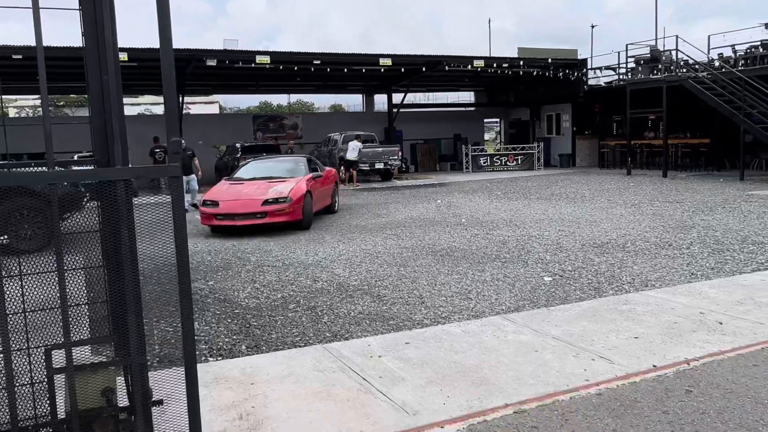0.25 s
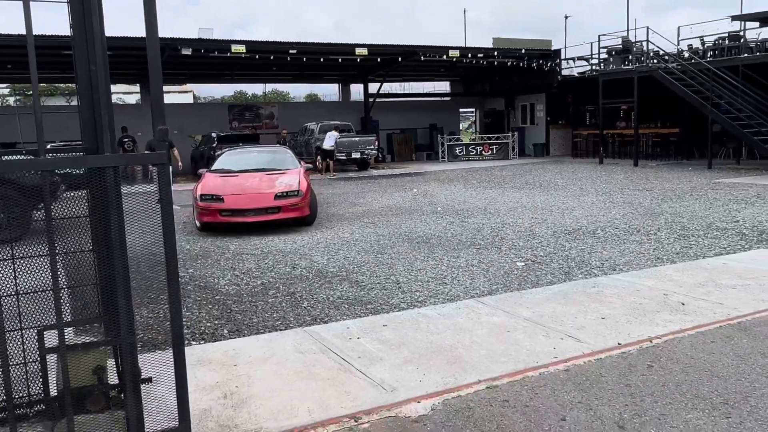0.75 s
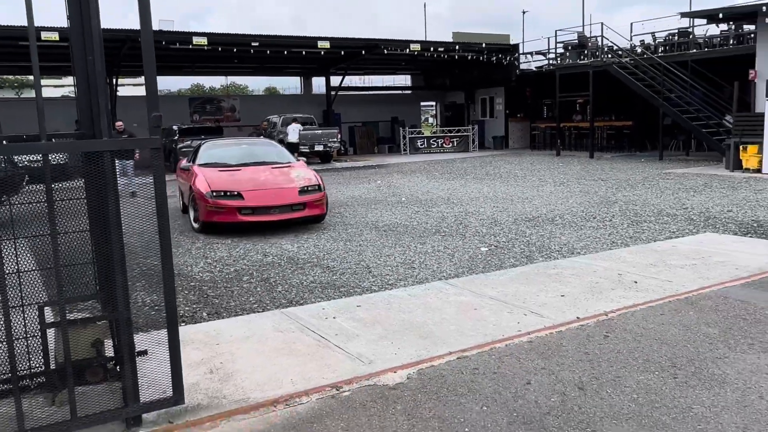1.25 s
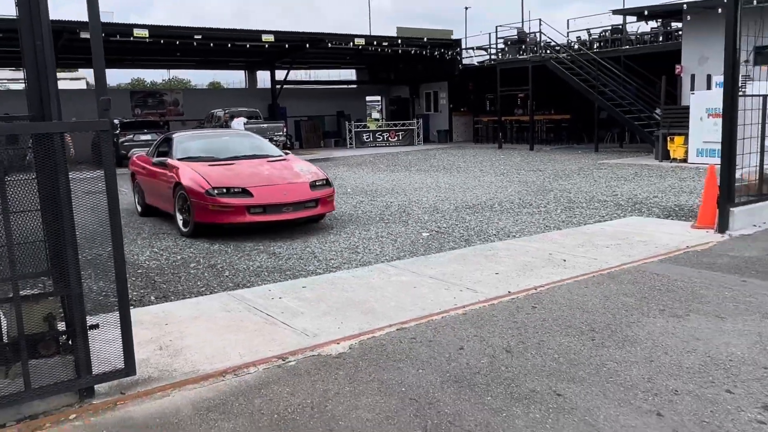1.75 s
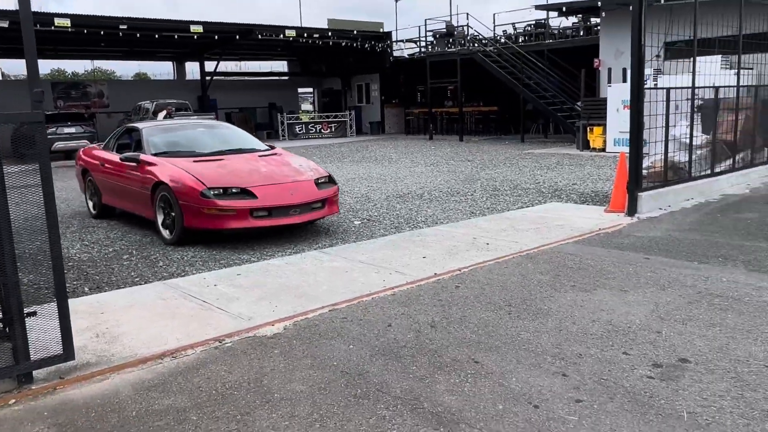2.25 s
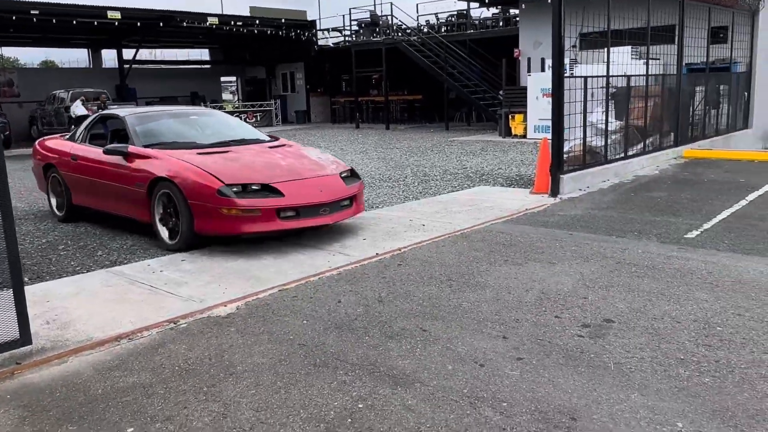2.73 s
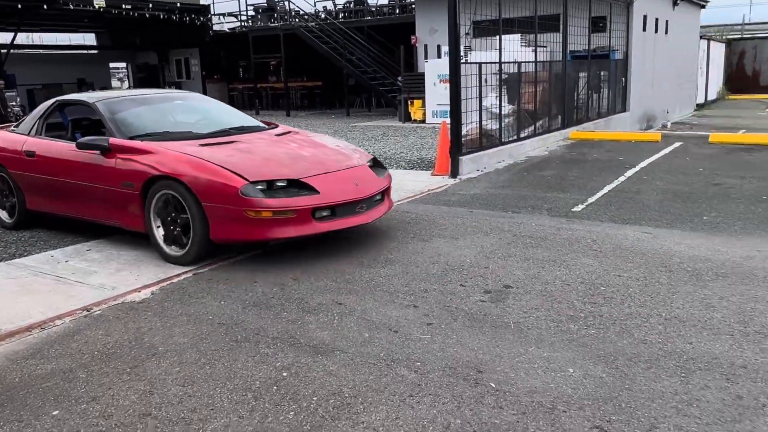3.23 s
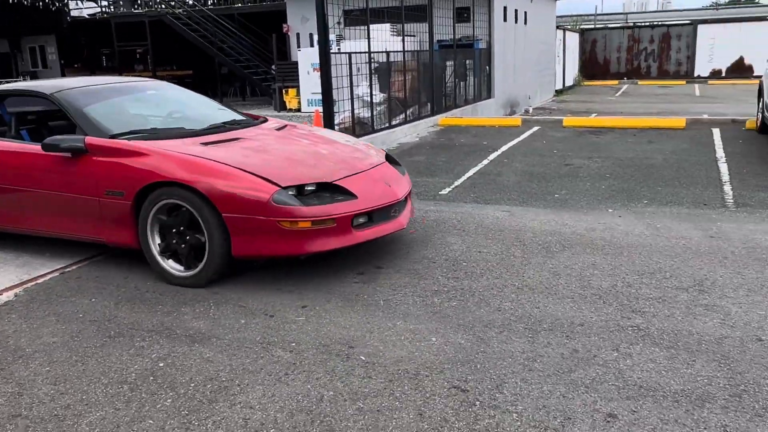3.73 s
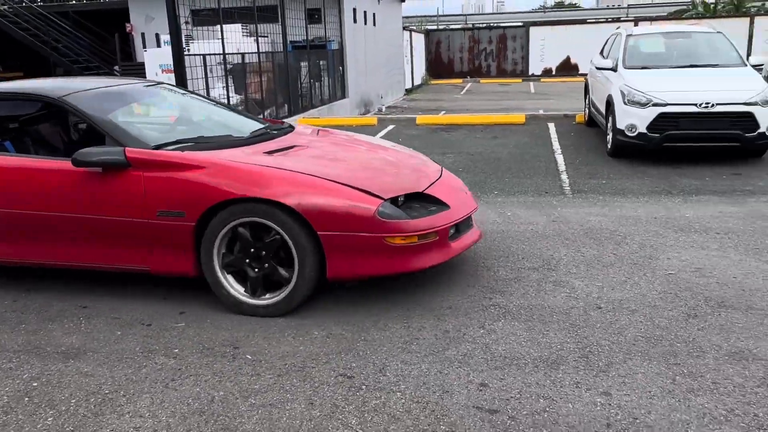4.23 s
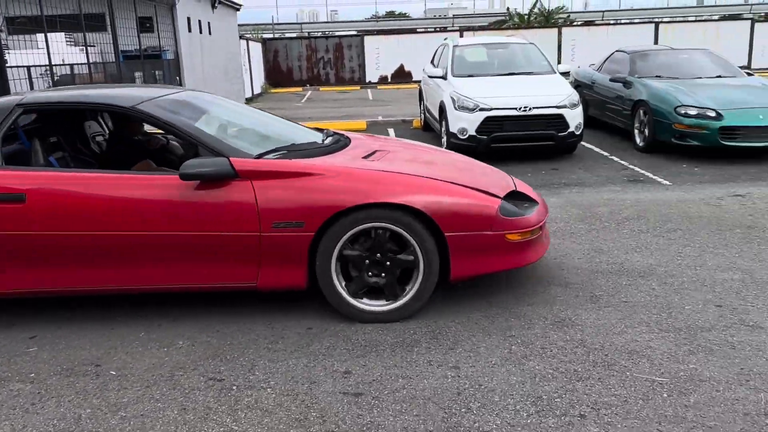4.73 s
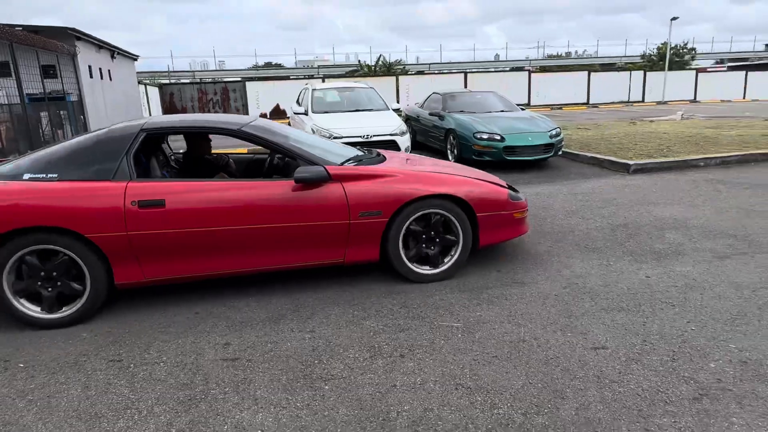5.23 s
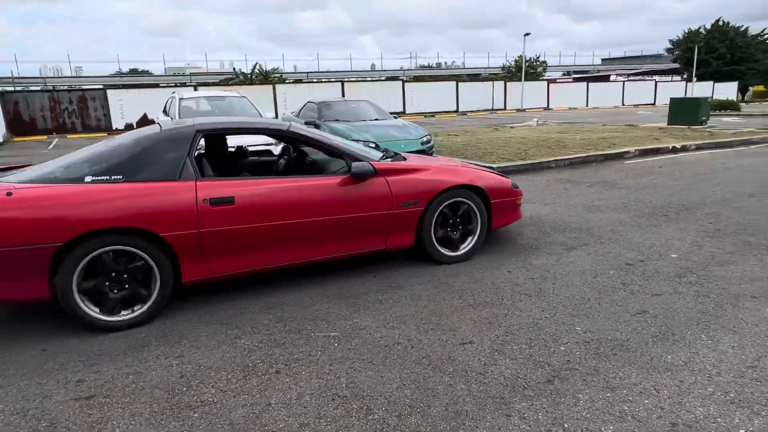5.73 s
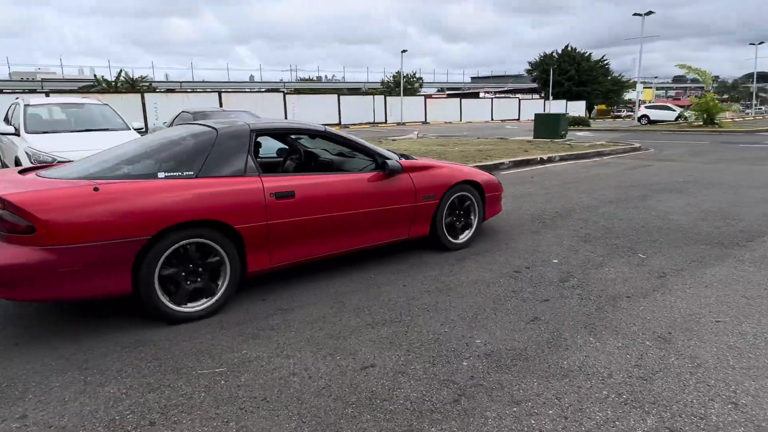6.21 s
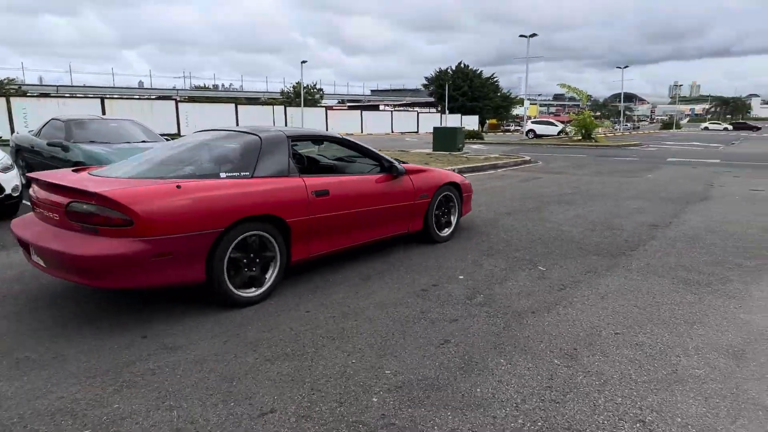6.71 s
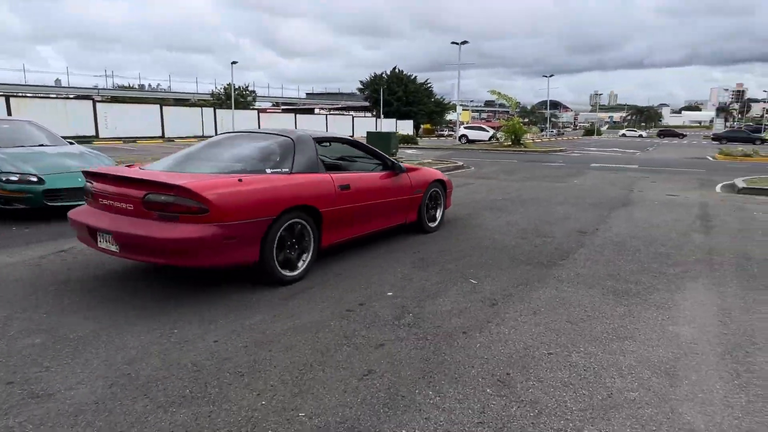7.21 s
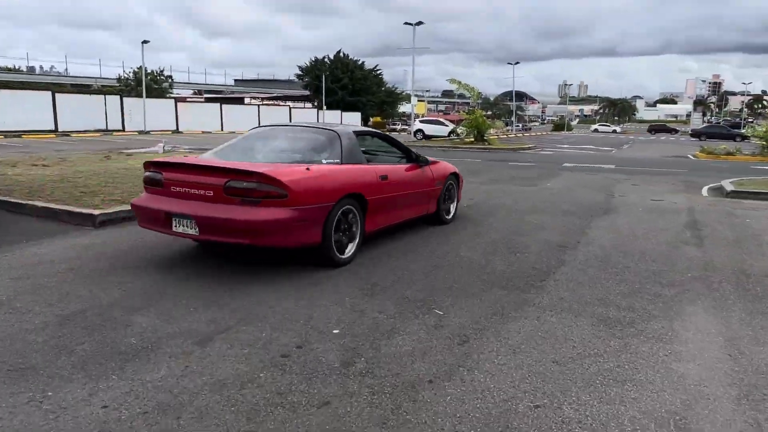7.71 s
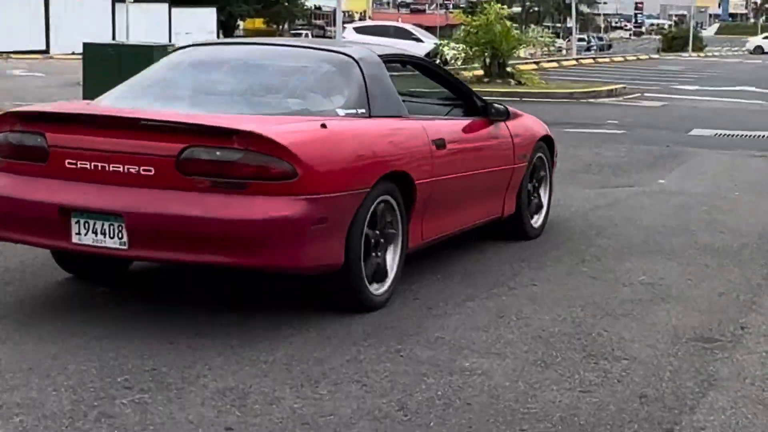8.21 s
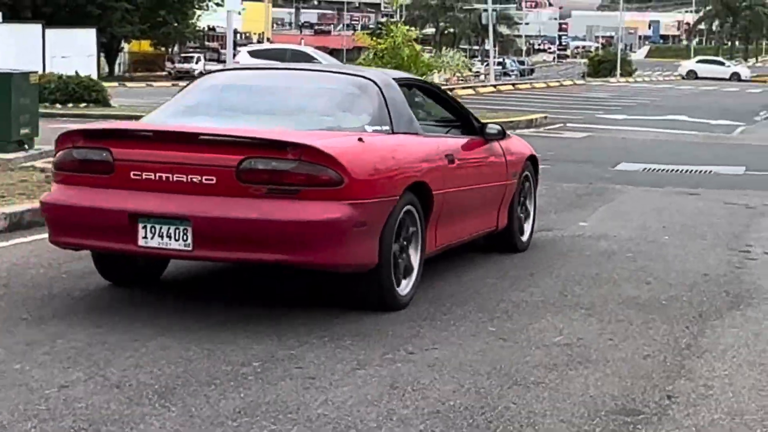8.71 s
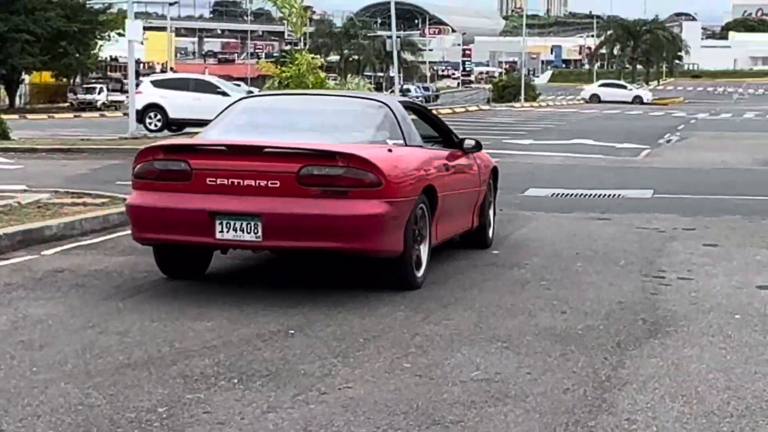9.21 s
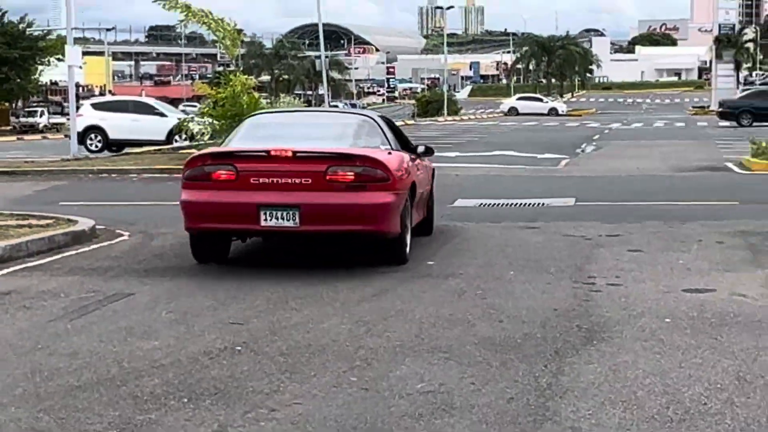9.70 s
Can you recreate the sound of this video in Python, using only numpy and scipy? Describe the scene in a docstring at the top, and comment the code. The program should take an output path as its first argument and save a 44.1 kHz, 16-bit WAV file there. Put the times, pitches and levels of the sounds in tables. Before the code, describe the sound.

Stones knock under tyres as a deep, booming V8 car accelerates past, drops to a stumbling idle and moves off.

```python
"""A V8 car with an open exhaust rolls off a gravel lot, with faint traffic far away. Its firings, uneven
between the cylinder banks, boom in the pipe resonances; turbulent gas roars and hisses at the tailpipes,
and stones crunch, knock and snap under the tyres. The revs climb and the car passes close by, onto
asphalt, with a rough whine. After 7 s the throttle closes, the idle stumbles and something rustles
nearby; then the sound narrows to the centre as the car drives away."""
import sys
import numpy as np
from scipy import signal
from scipy.fft import rfft, irfft, next_fast_len
from scipy.io import wavfile
from scipy.ndimage import uniform_filter1d

SR = 44100
rng = np.random.default_rng(int(sys.argv[2]) if len(sys.argv) > 2 else 0)


def output_pcm(signal):
    """Save a mono or channel-first signal as 16-bit PCM at the path in sys.argv[1].

    Samples are clipped to [-1, 1] before scaling.
    """
    pcm = np.clip(np.atleast_2d(signal).T, -1, 1) * 32767
    wavfile.write(sys.argv[1], SR, np.round(pcm).astype(np.int16))


N = 438794
TIME, FFT_SIZE = np.arange(N) / SR, next_fast_len(N)
LOG_HZ = np.log(np.arange(FFT_SIZE // 2 + 1) * SR / FFT_SIZE + 1)


def from_db(db):
    """Amplitude ratio of a level."""
    return 10 ** (np.asarray(db) / 20)


def unit_rms(x):
    """Normalisation to rms 1."""
    return x / np.sqrt(np.mean(x ** 2) + 1e-20)


def in_time(rows):
    """Linear interpolation of each column over t/s, one value a sample."""
    s, *columns = np.transpose(rows)
    return [np.interp(TIME, s, c) for c in columns]


def drift(rate_hz):
    """Low-pass noise of rms 1: a slow random modulator."""
    r = np.exp(-80 * np.pi * rate_hz / SR)
    slow = signal.lfilter([1], [1, -2 * r, r * r], rng.standard_normal(N // 40 + 2002))[2000:]
    return np.interp(np.arange(N) / 40, np.arange(len(slow)), unit_rms(slow))


def resonance(x, hz, width_hz, stages=1):
    """Damped two-pole resonators in cascade, each of peak gain 1."""
    r = np.exp(-np.pi * width_hz / SR)
    b, a = [(1 - r * r) / 2, 0, (r * r - 1) / 2], [1, -2 * r * np.cos(2 * np.pi * hz / SR), r * r]
    for _ in range(stages):
        x = signal.lfilter(b, a, x)
    return x


def coloured(spectrum, x, response=1):
    """Spectral shaping by (f/Hz, level/dB) rows and an optional complex response."""
    hz, db = np.transpose(spectrum)
    gain = from_db(np.interp(LOG_HZ, np.log(hz), db, -90, -90))
    return irfft(rfft(x, FFT_SIZE) * gain * response, FFT_SIZE)[:N]


def levelled(x):
    """Division by the running rms over 0.3 s."""
    return x / np.sqrt(uniform_filter1d(x ** 2, int(.3 * SR), mode="reflect") + 1e-12)


def rounded(x):
    """Low-pass filtering: a rounded pressure pulse holds little above the pipe note."""
    return signal.sosfilt(signal.butter(4, 520, fs=SR, output="sos"), x)


# Cylinder strengths in firing order: level/dB
CYLINDERS = [2.8, .8, -.9, .2, -.2, .9, 0, -.6]
# Uneven burning, worst at low revs and off the throttle: t/s, standard deviation/dB
BURN_SCATTER = [(0, .9), (1.4, 1.0), (2, .7), (3.8, .35), (7, .3), (7.4, 1.8), (8.3, 1.2), (9, .4),
                (9.95, .25)]
def firings(cycle):
    """Combustion variability: each pulse is one firing's departure from the mean strength."""
    count = np.floor(8 * cycle).astype(int)
    at = np.flatnonzero(np.diff(count)) + 1
    burn_db = in_time(BURN_SCATTER)[0][at] * rng.standard_normal(len(at))
    pulses = np.zeros(N)
    pulses[at] = from_db(np.array(CYLINDERS)[count[at] % 8] + burn_db) - from_db(CYLINDERS).mean()
    return rounded(pulses)


# Engine orders: multiples of the cycle rate
ORDERS = (7, 9, 10, 20, 8, 5, 6, 11, 12, 13, 14, 16, 21, 22, 23, 24, 15, 19)
# Orders swell as the revs carry them through pipe resonances: cycle rate/Hz, level/dB of each order
ORDER_LEVELS = [(6.2, -37, -32, -30, -44, -25, -53, -51, -42, -10.5, -15.5, -9.5, -13.5, -56, -45, -29.5, -45, -21, -36),
                (7.4, -30, -26, -32, -40, -23.5, -40, -36.5, -41, -13, -12.5, -33.5, -32.5, -46, -45, -33, -50, -25.5, -34),
                (8.5, -38, -24, -29, -50, -16, -39.5, -38.5, -23.5, -19, -25.5, -31, -42.5, -43, -39, -45.5, -45, -27.5, -24),
                (9.7, -47.5, -21.5, -37, -45, -13, -39, -40, -20.5, -26.5, -22.5, -20.5, -26, -44.5, -37.5, -38, -50, -22, -39),
                (11, -7, -20, -34, -35, -16, -31, -32, -27.5, -27, -37, -27.5, -42, -47, -48, -38, -38, -36, -26),
                (12.2, -24.5, -20, -19, -45, -13.5, -38.5, -23.5, -34, -29.5, -32.5, -18, -31.5, -48, -48.5, -33, -29, -34.5, -34),
                (13.2, -22, -30, -19.5, -38, -14.5, -21, -9, -37, -17, -24.5, -30, -28, -40, -48, -28, -24.5, -47, -35),
                (14, -23, -29, -22.5, -40, -15.5, -5.5, -9.5, -37, -21, -16, -27.5, -27, -31, -33, -27, -24.5, -41, -42),
                (14.6, -28, -27.5, -18, -38, -29, -2.5, -11, -33.5, -21.5, -15.5, -34, -37, -37, -28.5, -36, -37, -31, -48),
                (15, -30, -17.5, -17.5, -38, -21.5, -4.5, -14.5, -27, -29, -17, -37, -26, -47, -28, -22, -34, -54, -44)]
# Change of each order at full load: gain/dB
LOAD_GAINS = [7, 1, -1, -5, 11, -13, -7.5, 2.5, 0.5, -7.5, -2, 5.5, 4.5, -3.5, 2, -2, -2.5, -5.5]
# The high drone of orders 21-24 swells and fades over time: t/s, gain/dB
DRONE_LEVELS = [(0, -1), (1.6, 1), (2.2, -9), (2.7, 0.5), (3.2, 3.5), (3.6, 6), (4.2, -0.7), (4.7, -2),
                (5.1, 0), (5.5, 0), (5.9, 2.5), (6.3, 7), (6.7, 8), (7.1, -4), (7.4, -5), (9.95, -1.5)]
# Low neighbours of the bank tone, order 5: order, level/dB re that tone
BANK_NEIGHBOURS = [(3, -22), (4, -17)]
def engine_orders(cycle, cycle_hz, tones_db, load):
    """Harmonic series: the firings and the uneven beat of the two banks repeat once a cycle."""
    map_hz, *columns = np.transpose(ORDER_LEVELS)
    drone_db, = in_time(DRONE_LEVELS)
    levels_db = {k: tones_db + np.interp(cycle_hz, map_hz, column) + load_db * load
                 for k, column, load_db in zip(ORDERS, columns, LOAD_GAINS)}
    out = 0
    for k, db in levels_db.items():
        db = db + .8 * drift(11)
        if k >= 21:  # drone lines swell independently, their phases spread over the cycle
            db = db + drone_db + 2.5 * drift(4)
            turns = k * k / 8
        else:  # low orders line up into one chug a cycle
            flip = (1 + np.tanh((k * cycle_hz - 153) / 6)) / 4  # phase reversal at a 153 Hz resonance
            turns = -flip - .35 * (k % 8 == 0)  # the firing tones trail the chug
        out = out + from_db(db) * np.sin(2 * np.pi * (k * cycle + turns))
    for k, db in BANK_NEIGHBOURS:
        out = out + from_db(levels_db[5] + db) * np.sin(2 * np.pi * k * cycle)
    return np.sqrt(2) * out


# Echoes from bends, road and walls: delay/s, gain/dB
ECHOES = [(.004, -7), (.0095, -6), (.017, -0.5), (.026, -2), (.039, 3)]
def reflections(pulses):
    """Multipath spreads each pulse into a train, weaker once the tailpipes point straight back."""
    late = sum((-1) ** k * from_db(db) * np.r_[np.zeros(round(s * SR)), pulses][:N]
               for k, (s, db) in enumerate(ECHOES))
    return pulses + late * np.interp(TIME, [8.3, 9], [1, .75])


def pipe(pulses, modes, low_hz, turbulence_db):
    """Forced resonance: pulses and turbulence ring the modes; an open end radiates little deep bass."""
    drive = levelled(pulses) + from_db(turbulence_db) * unit_rms(rounded(rng.standard_normal(N)))
    rung = sum((-1) ** k * from_db(db) * resonance(drive, hz, width)
               for k, (hz, width, db) in enumerate(modes))
    return levelled(signal.sosfilt(signal.butter(4, low_hz, "high", fs=SR, output="sos"), rung))


# Exhaust balance: t/s, tones/dB, engine load (0-1), deep burble/dB, upper burble/dB, pipe note/dB
EXHAUST = [(0, 0.5, 0.34, -12.5, -28, -42), (.25, -7.5, 0.9, -22.5, -22.5, -35),
           (1.0, -8, 0.5, -20, -32, -45.5), (1.5, -3, 0.38, -19, -23.5, -40), (1.8, -7, 1, -27.5, -22, -30),
           (2.4, -6.5, 1, -20.5, -19.5, -28), (3.0, -1.5, 0.72, -20, -15, -26.5),
           (3.4, -2.5, 0.72, -14.5, -20.5, -24.5), (3.8, 2.5, 0.74, -18.5, -14, -22),
           (4.2, -1, 0.26, -19, -13.5, -29.5), (4.55, -2, 0.16, -16, -16, -36),
           (5.05, -1, 0.5, -15, -22.5, -19.5), (5.3, -3.5, 0.32, -24, -27, -28.5),
           (5.7, -5, 0.18, -11, -17, -22.5), (6.0, -2, 0.15, -19, -27, -25),
           (6.4, -3, 0.41, -19.5, -18.5, -26), (6.75, -5, 0.8, -20, -22, -21),
           (7.15, -5, 0.76, -28, -19.5, -27.5), (7.3, -5.5, 0.3, -27, -21, -39.5),
           (7.42, -14, 0.1, -27.5, -28.5, -43), (7.65, -6.5, 0.4, -21, -21.5, -36.5),
           (8.2, -8.5, 0, -23, -25.5, -34), (8.45, -8.5, 0.52, -25.5, -22, -34.5),
           (9.2, -8.5, 0.02, -35, -29, -36.5), (9.95, -9.5, 0.1, -36, -34, -37.5)]
# Pipe modes of the deep burble, upper burble and pipe note: f/Hz, bandwidth/Hz, level/dB
DEEP_MODES = [(72.2, 15, 0), (116.4, 28, -5.5)]
UPPER_MODES = [(132.4, 37.8, 3.5), (168, 32.6, 2.5), (182.2, 18.7, -1), (235.4, 61, -11)]
NOTE_MODES = [(316, 24, 0), (350, 45, -14)]
def exhaust_boom(cycle, cycle_hz, surge_db, width_db):
    """Superposition of orders and pipe modes; time and level differences place the near car right."""
    tones_db, load, deep_db, upper_db, note_db = in_time(EXHAUST)
    note_db = note_db + 1.43 * drift(3.74)
    pulses = firings(cycle)
    echoed = reflections(pulses)
    boom = engine_orders(cycle, cycle_hz, tones_db, load)
    boom += from_db(deep_db) * pipe(pulses, DEEP_MODES, low_hz=64, turbulence_db=-16)
    boom += from_db(upper_db) * pipe(echoed, UPPER_MODES, low_hz=115, turbulence_db=-18)
    boom += from_db(note_db) * pipe(echoed, NOTE_MODES, low_hz=285, turbulence_db=-17)
    boom *= from_db(surge_db)
    width = from_db(width_db)
    left = from_db(-.55 * width) * np.interp(TIME - 50e-6 * width, TIME, boom)
    return np.array([left, boom])


# Part of the stereo side signal that follows the mid signal: f/Hz, share, phase/rad
COHERENCE = [(300, .3, 1.1), (690, .6, 1.0), (860, .55, -.4), (1030, .55, -1.8), (1210, .65, -3.2),
             (1720, .55, -4.8), (2070, .15, -6), (2760, .45, -7.5), (3450, .65, -7.5), (5500, .15, -7.6),
             (7000, .65, -7.8)]
def turbulence(cycle, mid_spectrum, side_spectrum, modes, side_db, puff, flutter_db):
    """Amplitude modulation: gas noise swells with each firing, partly coherent between the channels."""
    swell = (1 + puff * np.cos(2 * np.pi * 8 * cycle)) * from_db(flutter_db * drift(14))
    common, independent = swell * rng.standard_normal((2, N))
    ringing = sum(from_db(db) * unit_rms(resonance(common, hz, width, stages=2))
                  for hz, width, db in modes)
    nearness = np.minimum(from_db(side_db + 20.5), 1)
    mid = unit_rms(coloured(mid_spectrum, common)) + nearness * ringing
    hz, *columns = np.transpose(COHERENCE)
    share, phase = (np.interp(LOG_HZ, np.log(hz), c) for c in columns)
    side = coloured(side_spectrum, common, share * np.exp(1j * phase))
    side += .85 * coloured(side_spectrum, independent)
    return unit_rms(mid) + from_db(side_db) * unit_rms(side) * [[1], [-1]]


# Lag of the path by way of the road: t/s, delay/ms
ROAD_DELAY = [(0, 1.31), (2.5, 1.354), (3.8, 1.22), (5, 1.127), (6.3, 1.18), (7.3, 1.27), (9.95, 1.39)]
def ground_reflection(x):
    """Comb filtering: a dull bounce off the road cuts notches that slide as the car passes."""
    sent_s = TIME - in_time(ROAD_DELAY)[0] / 1000
    dull = signal.filtfilt(*signal.butter(2, 2700, fs=SR), x)
    return x + from_db(-5.5) * np.array([np.interp(sent_s, TIME, channel) for channel in dull])


# Gas and tyre noise: t/s, roar/dB, hiss/dB
FLOW_LEVELS = [(0, -32.5, -43.5), (.16, -39.5, -51.5), (.4, -39, -51), (1.22, -40, -49.5),
               (1.8, -33, -46.5), (2.2, -31.5, -44.5), (3.2, -25.5, -38), (4.3, -25, -37.5),
               (5.32, -27, -39.5), (5.6, -27.5, -39.5), (6.1, -31, -43.5), (6.87, -28, -43.5),
               (7.1, -29, -45.5), (7.29, -39.5, -51.5), (7.67, -39, -47.5), (7.92, -40.5, -53),
               (8.34, -37.5, -53), (9.23, -43.5, -56), (9.95, -42.5, -55.5)]
# Mid and side spectra of the roar and the hiss: f/Hz, relative density/dB
ROAR_MID = [(220, -50), (380, 5), (470, -8.5), (619, -4.5), (683, -9), (744, -7), (894, -13.5), (1040, -12),
            (1500, -18.5), (1950, -79), (3300, -120)]
ROAR_SIDE = [(120, -39.5), (200, -26), (237, -11), (318, -1), (416, 8), (668, -2), (1500, -12),
             (1950, -59.5), (3300, -120)]
HISS_MID = [(760, -24.5), (1300, -9), (1840, 3.5), (2090, 1), (2280, -0.5), (2850, -2.5), (4010, -2.5),
            (4460, -6.5), (6150, -8), (7830, -15), (9450, -13), (10300, -20.5), (11000, -80), (14300, -79),
            (22000, -120)]
HISS_SIDE = [(760, -32), (1300, -10), (1820, -6.5), (2170, 2.5), (2890, 1), (5540, -7), (6280, -13.5),
             (10400, -10.5), (15000, -15.5), (16000, -25)]
# Gas ringing in the tailpipes, heard close by: f/Hz, bandwidth/Hz, level/dB re roar
TAILPIPE_MODES = [(399.7, 100, -7)]
def flow_noise(cycle, surge_db, width_db):
    """Turbulent flow radiates a broadband roar and hiss, heard directly and off the road."""
    roar_db, hiss_db = in_time(FLOW_LEVELS) + .61 * surge_db
    roar = turbulence(cycle, ROAR_MID, ROAR_SIDE, TAILPIPE_MODES, width_db - 4, puff=.099, flutter_db=1)
    hiss = turbulence(cycle, HISS_MID, HISS_SIDE, [], width_db, puff=.051, flutter_db=1.18)
    return ground_reflection(from_db(roar_db) * roar + from_db(hiss_db) * hiss)


def swells(rows):
    """Gaussian swells and dips of level, in dB."""
    return sum(db * np.exp(-((TIME - s) / half_s) ** 2) for s, half_s, db in rows)


def grains(per_s, low_hz, high_hz, q, clumps_db):
    """Shot noise: clumped random clicks of uneven size each ring one of six resonances."""
    born = rng.random((2, N)) < per_s * from_db(clumps_db * drift(9)) / SR
    clicks = born * from_db(4 * np.minimum(rng.exponential(1, (2, N)), 3)) + 1e-18
    band = rng.integers(0, 6, N)
    return unit_rms(sum(resonance(clicks * (band == k), hz, hz / q, stages=2)
                        for k, hz in enumerate(np.geomspace(low_hz, high_hz, 6))))


# Gravel under the tyres, faint once the car is on asphalt: t/s, crunch/dB, grit/dB
GRAVEL_LEVELS = [(0, -32, -48), (.2, -45, -63), (.5, -41.5, -63), (.9, -40, -59.5), (1.4, -41.5, -56),
                 (1.9, -38.5, -50.5), (2.3, -35, -49), (2.8, -35.5, -47), (3.3, -37, -52),
                 (3.7, -52.5, -80), (9.95, -48, -70.5)]
# A tyre crushes a patch of grit: t/s, half length/s, gain/dB
CRUSHES = [(.59, .012, 14), (.67, .01, 13), (.795, .012, 14), (.85, 0.018, 13), (.945, .022, 12),
           (1.01, .012, 5), (1.26, .02, 5), (1.33, .015, 11), (1.6, 0.044, 6), (1.77, .012, 9),
           (1.93, .03, 8), (2.02, 0.033, 7), (2.155, 0.044, 10.5), (2.42, 0.016, 6), (2.61, .025, 6)]
def gravel():
    """Many small impacts under the tyres merge into a low crunch and a bright grit."""
    crunch_db, grit_db = in_time(GRAVEL_LEVELS)
    crunch = from_db(crunch_db) * grains(120, 620, 950, q=4, clumps_db=4)
    grit = from_db(grit_db + swells(CRUSHES)) * grains(2500, 4600, 7200, q=6, clumps_db=2)
    return crunch + grit


# Spectrum of far traffic: f/Hz, relative density/dB
TRAFFIC_SPECTRUM = [(530, -31), (900, -2.5), (977, 10.5), (1250, 12), (2680, -1), (7210, -36), (10300, -49),
                    (13400, -65), (22000, -120)]
def far_traffic():
    """Incoherent distant sources sum to a steady noise."""
    return from_db(-50.5) * unit_rms(coloured(TRAFFIC_SPECTRUM, rng.standard_normal(N)))


def impacts(events, width_ratio, decay_s, correlation=.074):
    """Transient excitation: each decaying noise burst rings a broad resonance."""
    out, t = np.zeros((2, N)), np.arange(3000) / SR
    for s, db, hz, pan_db in events:
        burst = rng.standard_normal((2, len(t))) * np.exp(-t / decay_s)
        burst = resonance(burst, hz, width_ratio * hz, stages=2)
        burst[1] = correlation * burst[0] + np.sqrt(1 - correlation ** 2) * burst[1]
        burst *= from_db(db + np.array([[.5], [-.5]]) * pan_db) / np.abs(burst).max()
        start = round(s * SR)
        out[:, start:start + len(t)] += burst[:, :N - start]
    return out


def cracks(events, bright_hz, dull_hz, decay_s):
    """Broadband transients, each with a bright and a dull band."""
    bright = impacts([(s, db, bright_hz, pan) for s, db, _, pan in events], .51, decay_s)
    dull = impacts([(s, db, dull_hz, pan) for s, _, db, pan in events], .9, decay_s)
    return bright + dull


# Stones knocking: t/s, peak level/dB, f/Hz, left-right/dB
STONE_KNOCKS = [(0.264, -27, 670, 2), (0.522, -30, 690, -4), (0.552, -28, 1390, -4), (0.554, -18, 700, -2),
                (0.59, -23, 824, -2), (0.669, -21, 660, -3), (0.72, -29, 770, 8), (0.925, -24, 675, 6),
                (1.009, -24.5, 680, -3), (1.251, -25.5, 660, -2), (1.298, -20, 630, 1),
                (1.381, -26, 710, -4), (1.606, -15, 730, 1), (1.628, -20.5, 740, 2), (2.052, -22, 620, 1),
                (2.16, -13, 620, 1), (2.178, -19, 695, 2), (2.205, -15, 620, 0), (2.333, -18.5, 600, 0),
                (2.545, -20, 860, 0), (3.088, -15, 720, -2), (3.155, -18, 744, 3), (3.259, -14, 730, -1)]
# Grit snapping: t/s, bright peak/dB, dull peak/dB, left-right/dB
GRIT_SNAPS = [(0.5503, -35, -24.5, 3), (0.668, -38, -34, 0), (0.924, -32, -48, 0), (1.0023, -34, -36, 2),
              (1.2492, -44, -49, -6), (1.766, -33, -37, 4), (1.9232, -28, -46, -3), (1.9796, -29, -37, 10),
              (2.1364, -32, -46, -3), (2.4212, -20, -24, 0), (2.5458, -22.5, -31, 6), (2.7229, -34, -47, 3),
              (2.777, -28, -37, 5), (2.868, -42, -39, 3), (2.9598, -22, -38, 1), (3.2078, -39, -31, 5),
              (3.3993, -36, -32, 8)]
def stones():
    """Heavily damped impacts: single stones knock and grit snaps under the tyres."""
    knocks = impacts(STONE_KNOCKS, width_ratio=.55, decay_s=.006, correlation=.8)
    return knocks + cracks(GRIT_SNAPS, bright_hz=6000, dull_hz=2500, decay_s=.0025)


def gliding_bands(track, partials):
    """Narrow-band noise: random quadrature modulation of a gliding carrier, faded in and out."""
    hz, db = in_time(track)
    phase = 2 * np.pi * np.cumsum(hz) / SR
    fade = np.clip(np.minimum(TIME - track[0][0], track[-1][0] - TIME) / .3, 0, 1)
    bands = sum(from_db(part_db) * (drift(width) * np.sin(k * phase) + drift(width) * np.cos(k * phase))
                for k, width, part_db in partials)
    return fade * from_db(db) * bands


# Pitched rings in the roar, one track each: t/s, f/Hz, level/dB
RING_TRACKS = [
    [(2.9, 688, -49), (3.4, 703, -32), (3.9, 694, -35.5), (4.5, 672, -35.5), (4.75, 680, -48),
     (5.0, 684, -33), (5.3, 634, -37), (5.8, 645, -39.5), (6.5, 682.6, -58), (7.0, 680, -47),
     (7.4, 650, -45)],
    [(3.3, 537, -48), (3.75, 541, -43), (4.3, 537, -41), (4.7, 561, -34.5), (5.2, 539, -39.5),
     (5.7, 492, -40), (6.3, 440, -62)],
    [(3.8, 866, -41), (4.6, 897, -39), (5.1, 916, -35.5), (5.4, 874, -38), (5.9, 928, -47), (6.4, 922, -42),
     (7.0, 871, -42), (7.4, 863, -44)],
    [(0.7, 4000, -62), (1.0, 4000, -65), (1.4, 3960, -65), (1.7, 3950, -64), (2.0, 3940, -54),
     (2.2, 4040, -53), (2.6, 4020, -61)],
    [(8.9, 275, -52), (9.25, 281.3, -44), (9.6, 277.6, -43), (10.3, 284.5, -41)],
    [(5.6, 3675, -52), (6.1, 3670, -57), (6.7, 3600, -58), (7.3, 3580, -55)],
]
def roar_rings():
    """Narrow spectral peaks, a little to the left, slide as the car turns."""
    rings = sum(gliding_bands(track, [(.98, .023 * track[0][1], 0)]) for track in RING_TRACKS)
    return rings * from_db([[1.5], [-1.5]])


# Course of the whine: t/s, f/Hz, level/dB
WHINE_TRACK = [(2.4, 2050, -59), (2.9, 2070, -50), (3.3, 2170, -46), (3.55, 2226, -41), (3.8, 2260, -40),
               (4.02, 2280, -47), (4.22, 2320, -43), (4.45, 2300, -52), (4.72, 2260, -50),
               (4.85, 2270, -41), (5.15, 2310, -42), (5.45, 2343, -45), (5.84, 2391, -44), (6.2, 2392, -50),
               (6.7, 2253, -49), (7.3, 2195, -50)]
# Its partials: frequency ratio, bandwidth/Hz, level/dB
WHINE_PARTIALS = [(1, 70, 0), (.81, 120, -2.5), (1.72, 200, -5)]
def whine():
    """Three inharmonic noise bands fluctuate fast enough to be heard as one rough whine."""
    return gliding_bands(WHINE_TRACK, WHINE_PARTIALS) / np.sqrt(2)


# Fine rustle close by: t/s, bright/dB, dull/dB
RUSTLE_LEVELS = [(7.42, -90, -90), (7.47, -66, -52), (7.56, -58, -50), (7.64, -52, -47), (7.72, -59, -56),
                 (7.77, -63, -65), (7.83, -64, -56), (7.9, -65, -58), (7.96, -54, -46), (8.02, -62, -48),
                 (8.1, -75, -66), (8.2, -69, -69), (8.28, -64, -55), (8.36, -73, -60), (8.45, -88, -92)]
# Ticks within it: t/s, bright peak/dB, dull peak/dB, left-right/dB
RUSTLE_TICKS = [(7.4614, -60, -31, -1), (7.5178, -42, -31, 4), (7.565, -29, -33, 5),
                (7.5805, -24.5, -32, 0.0), (7.6105, -31, -36, 0.5), (7.6813, -27, -45, 1.5),
                (7.697, -26, -47, 0.0), (7.8101, -43, -48, 0.0), (7.826, -43, -37, 0),
                (7.9365, -34.5, -34, 3), (7.9544, -38, -35, 2), (7.9844, -40, -36, 0.0)]
# One broad snap: t/s, peak level/dB, f/Hz, left-right/dB
CLOSE_SNAP = [(7.5477, -19.5, 2630, 5)]
def rustle():
    """Dense tiny transients fuse into a rustle; a few ticks and one snap stand out."""
    bright_db, dull_db = in_time(RUSTLE_LEVELS)
    bright = from_db(bright_db) * grains(3000, 4000, 9500, q=4, clumps_db=3)
    dull = from_db(dull_db) * grains(1500, 1200, 3800, q=4, clumps_db=3)
    ticks = cracks(RUSTLE_TICKS, bright_hz=8300, dull_hz=2200, decay_s=.005)
    return bright + dull + ticks + impacts(CLOSE_SNAP, width_ratio=.62, decay_s=.004)


# Engine speed, eight firings to a cycle: t/s, cycle rate/Hz
CYCLE_RATE = [(0, 8.99), (.4, 7.37), (.7, 6.55), (1.0, 6.2), (1.2, 7.02), (1.6, 9.23), (2.0, 10.43),
              (2.4, 11.28), (2.8, 12.21), (3.1, 13.18), (3.4, 13.94), (3.75, 14.63), (4.2, 15.01),
              (4.6, 14.88), (5.4, 13.93), (5.8, 12.76), (6.0, 11.98), (6.2, 11.55), (6.6, 12.94),
              (6.8, 13.52), (7.0, 13.85), (7.1, 13.21), (7.3, 9.92), (7.5, 8.65), (7.9, 8.22), (8.4, 8.6),
              (9.15, 9.4), (9.6, 9.6), (9.95, 9.66)]
# Off the throttle the idle stumbles and catches: t/s, half length/s, gain/dB
IDLE_SURGES = [(7.614, 0.046, 4), (7.728, 0.025, 5), (7.823, 0.088, -3), (7.883, 0.013, 5),
               (7.982, 0.041, 3.5), (8.083, 0.019, 2.5), (8.232, 0.04, 3.5), (8.316, 0.039, 4.5),
               (8.39, 0.037, -4)]
def scene():
    """Linear superposition of all sources; one engine cycle times both the boom and the gas noise."""
    cycle_hz, = in_time(CYCLE_RATE)
    cycle = np.cumsum(cycle_hz) / SR
    surge_db = swells(IDLE_SURGES)
    width_db = np.interp(TIME, [7.96, 8.28], [0, -26])  # a far car reaches both channels alike
    exhaust = exhaust_boom(cycle, cycle_hz, surge_db, width_db) + flow_noise(cycle, surge_db, width_db)
    return exhaust + gravel() + far_traffic() + stones() + roar_rings() + whine() + rustle()


def record(dry):
    """Soft saturation rounds the peaks; a steep low-pass stops everything above 15.9 kHz."""
    low_pass = signal.cheby2(12, 70, 15900, fs=SR, output="sos")
    return signal.sosfilt(low_pass, 1.05 * np.tanh(dry / 1.05))


dry = scene()
out = record(dry)
output_pcm(out)
```